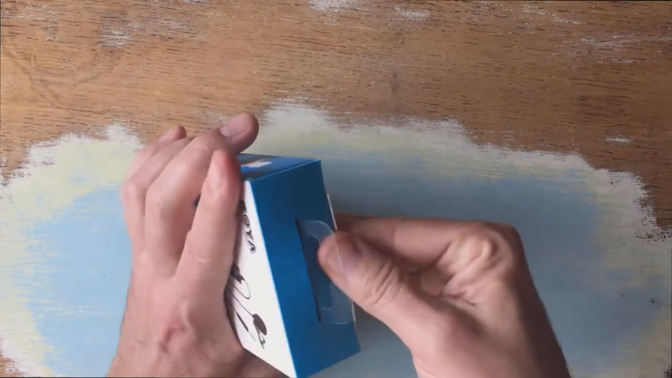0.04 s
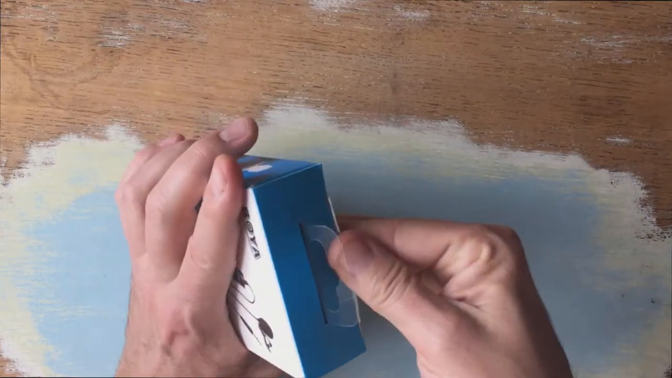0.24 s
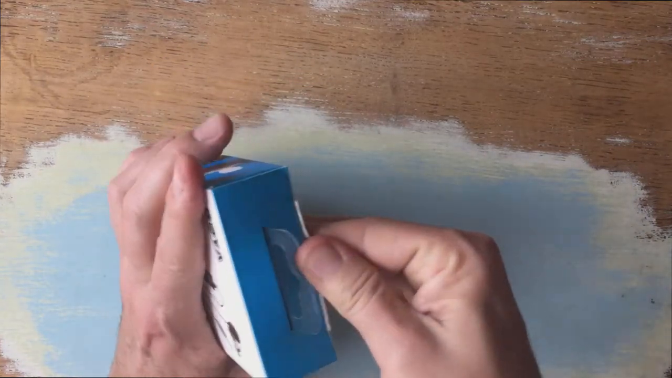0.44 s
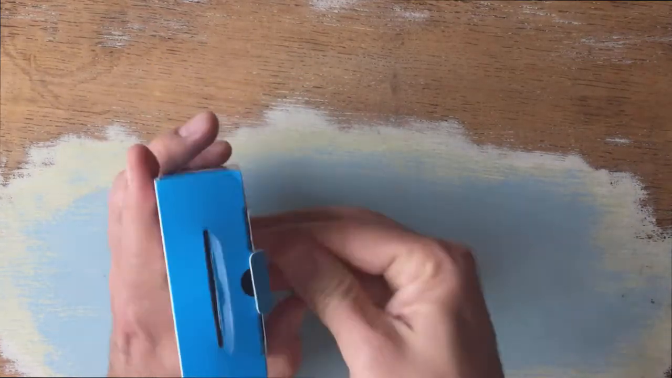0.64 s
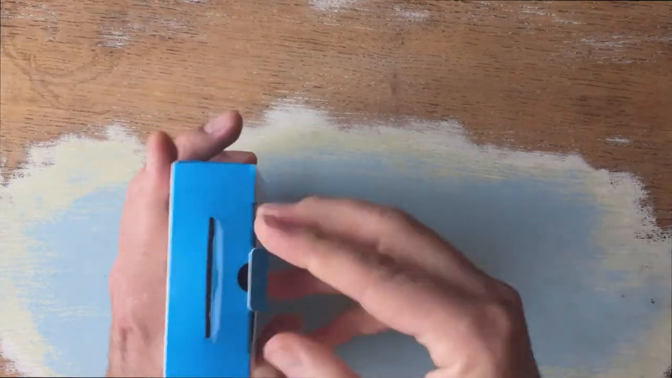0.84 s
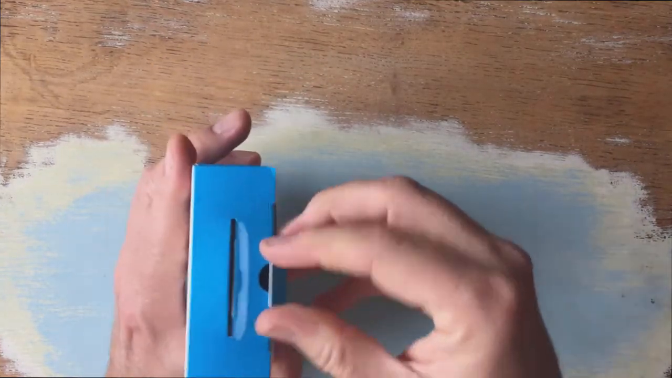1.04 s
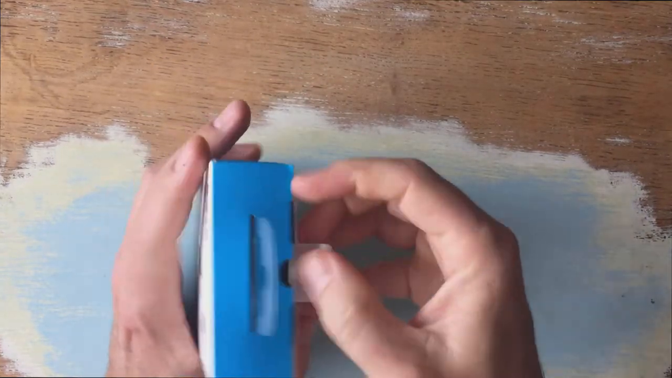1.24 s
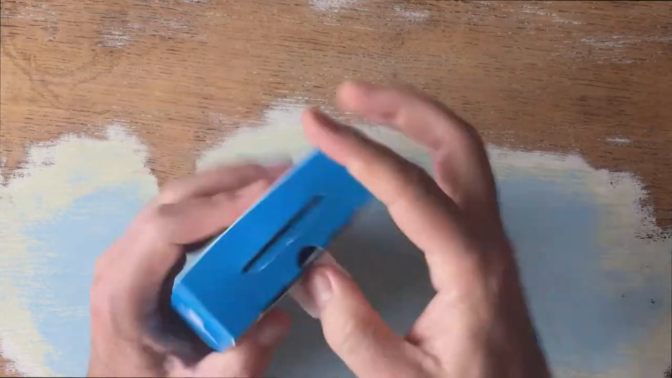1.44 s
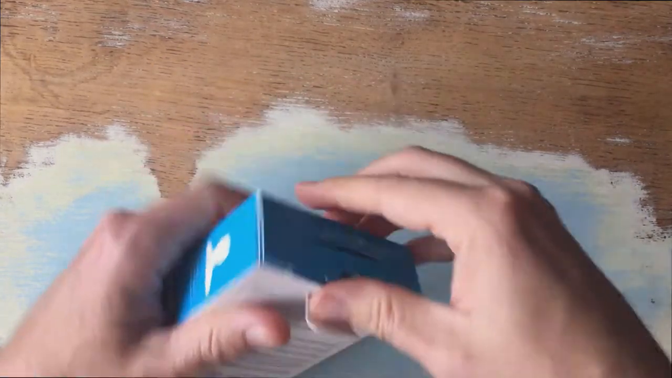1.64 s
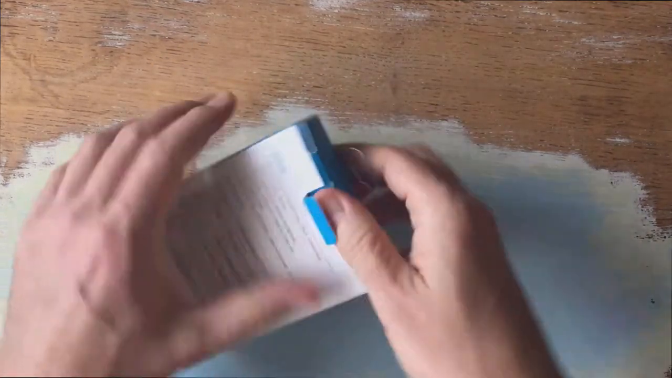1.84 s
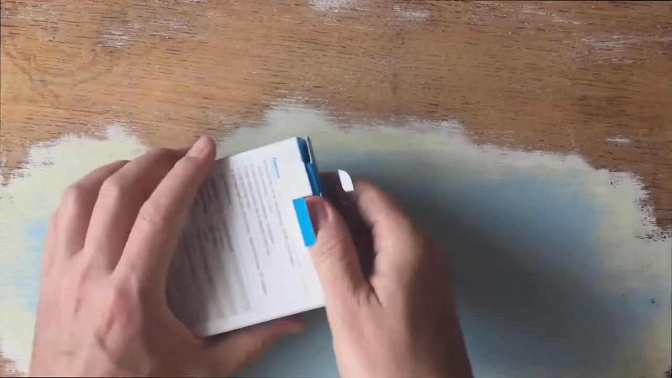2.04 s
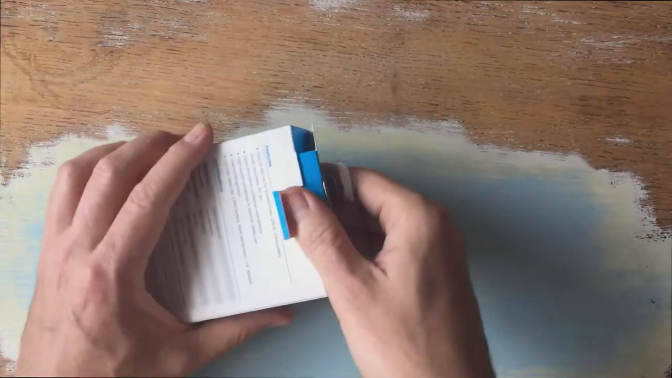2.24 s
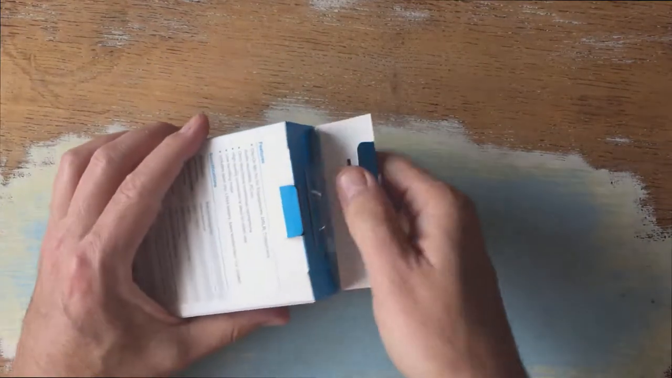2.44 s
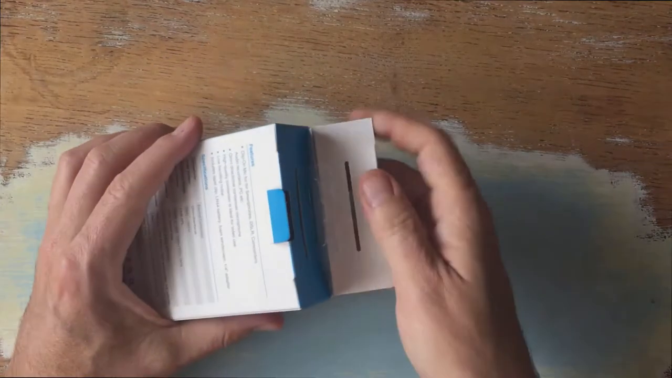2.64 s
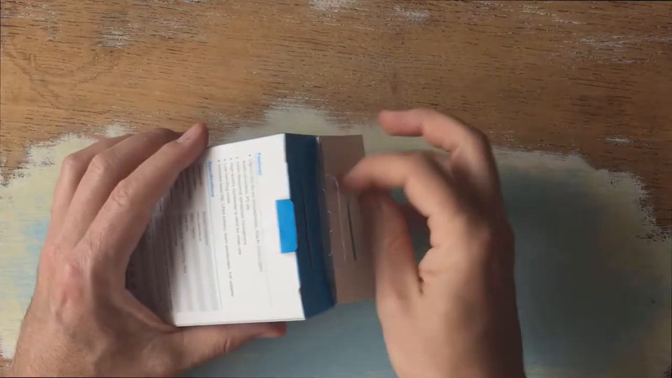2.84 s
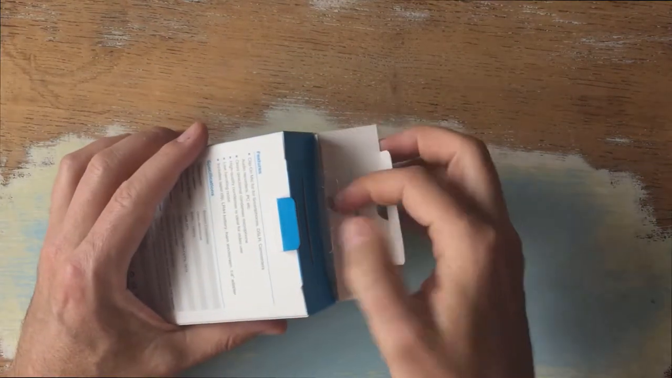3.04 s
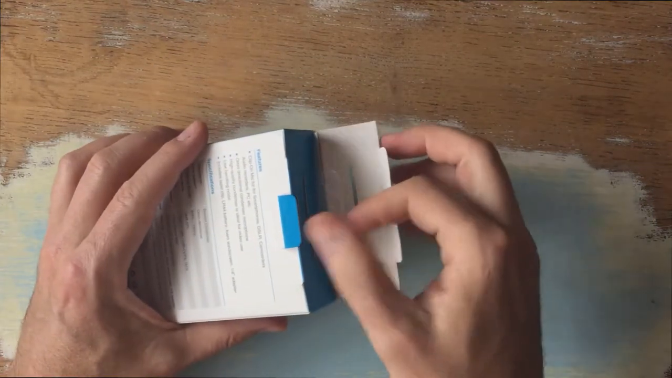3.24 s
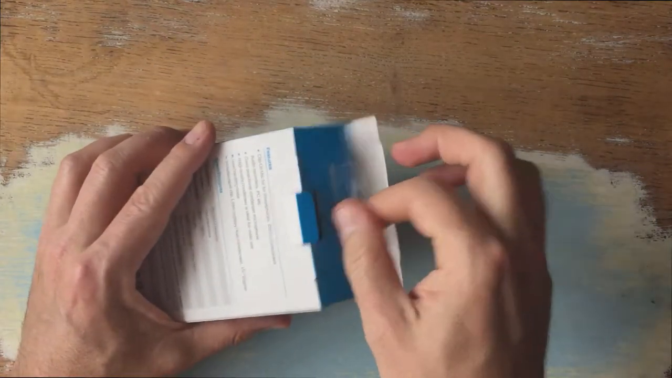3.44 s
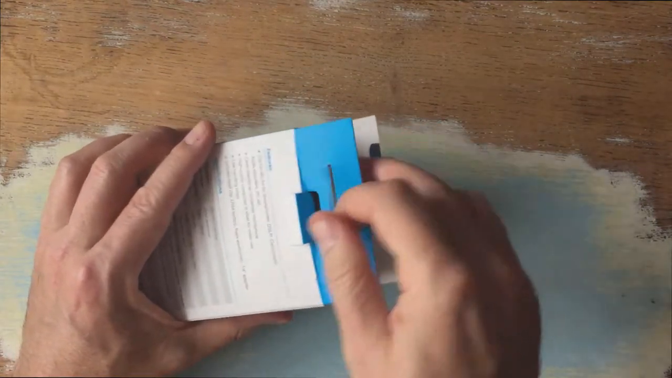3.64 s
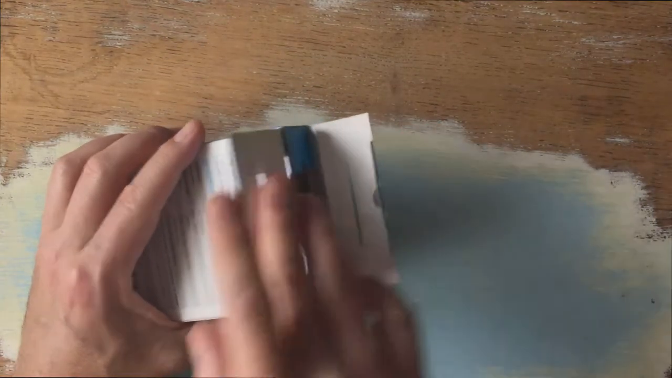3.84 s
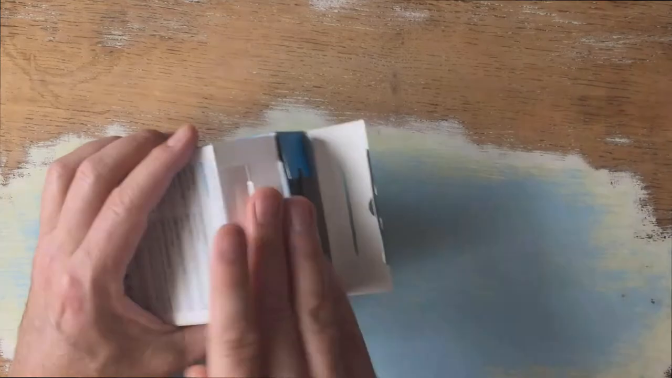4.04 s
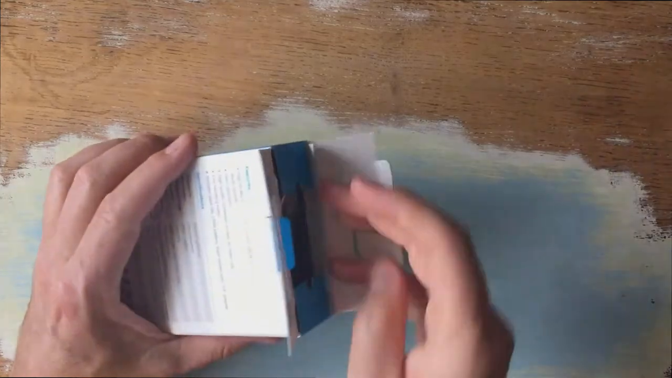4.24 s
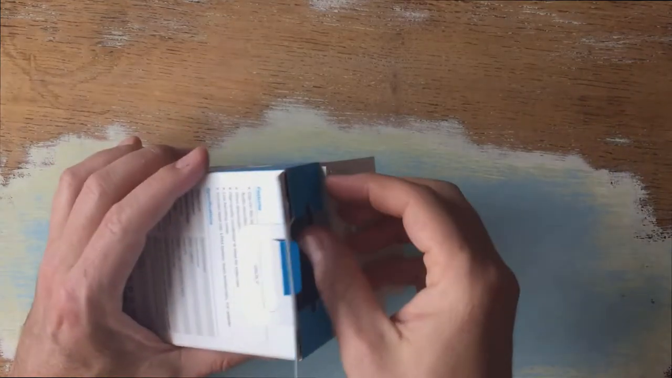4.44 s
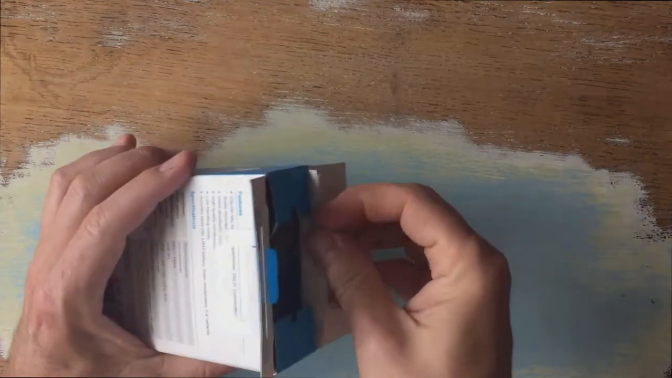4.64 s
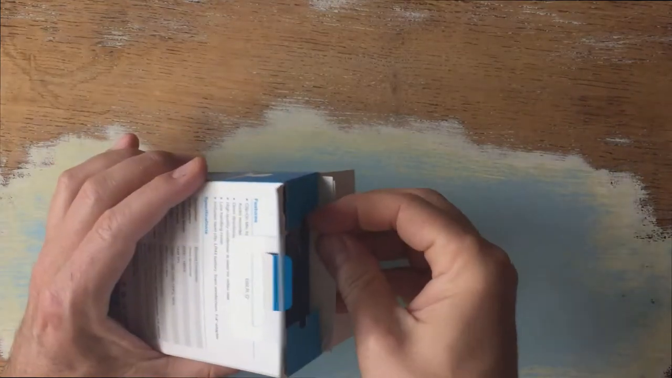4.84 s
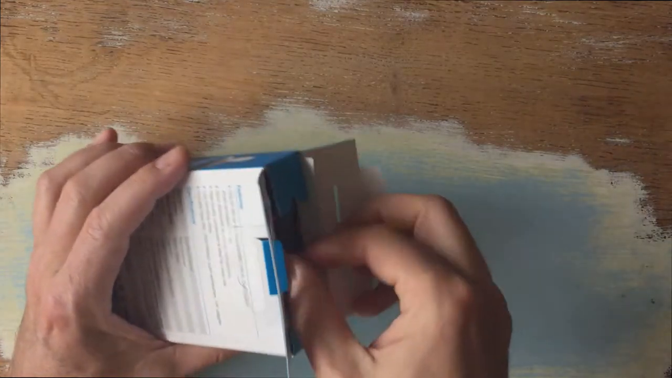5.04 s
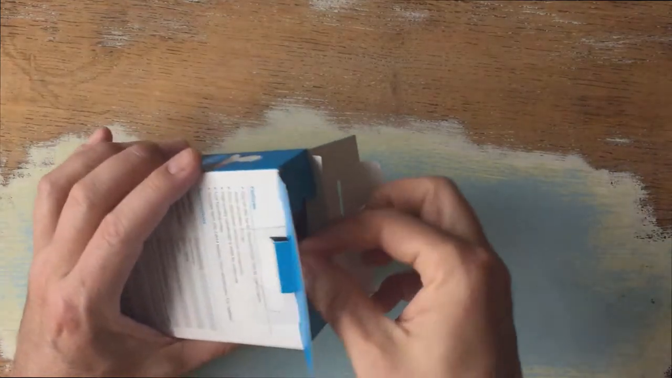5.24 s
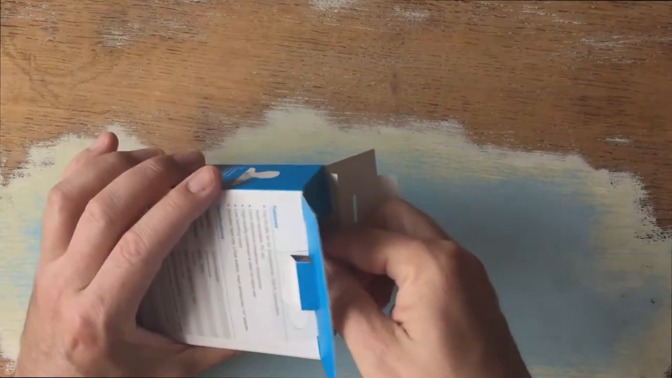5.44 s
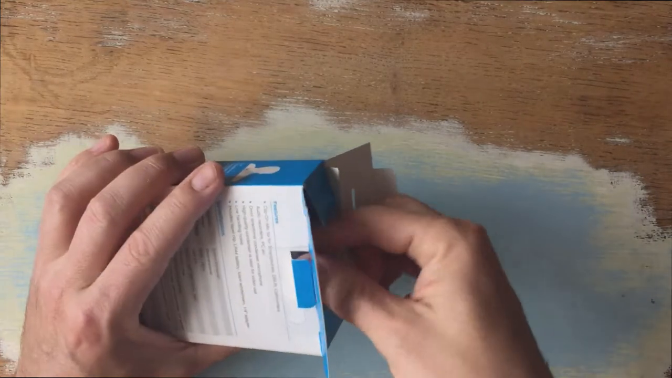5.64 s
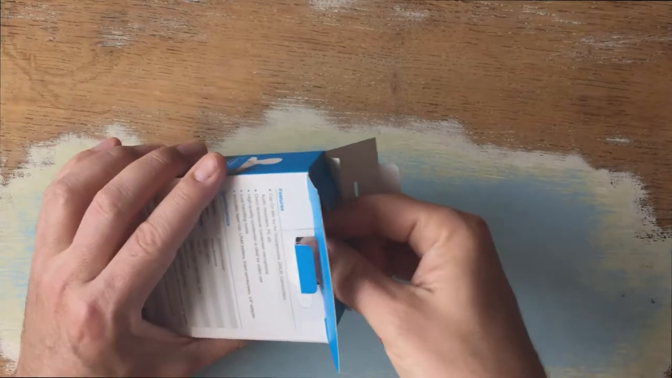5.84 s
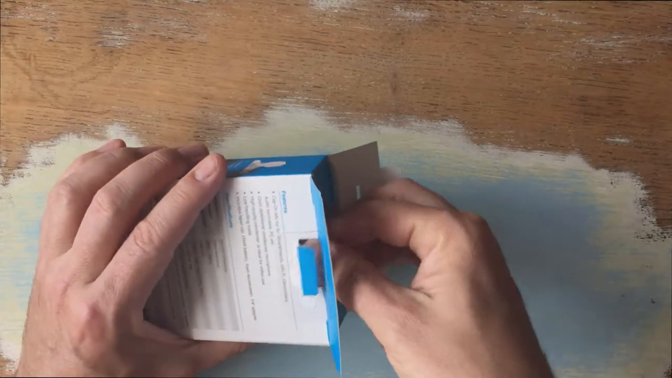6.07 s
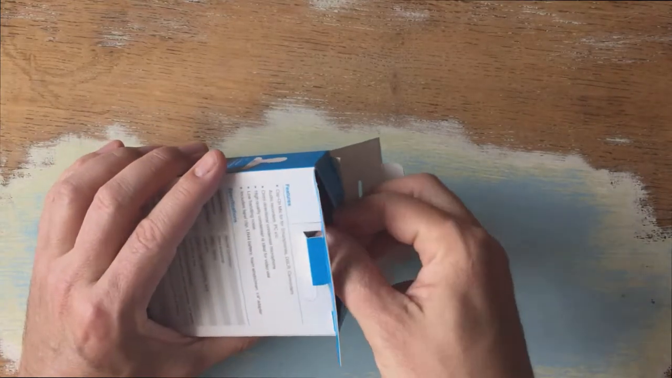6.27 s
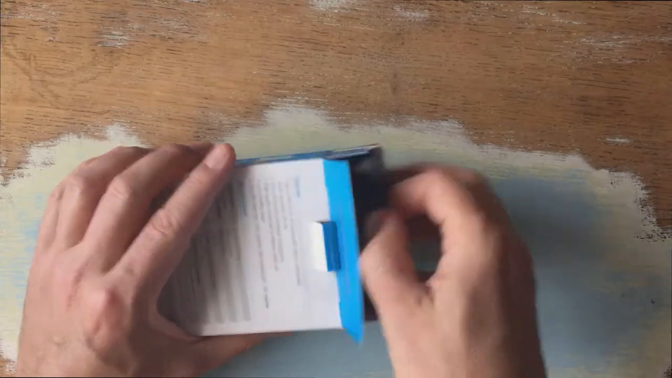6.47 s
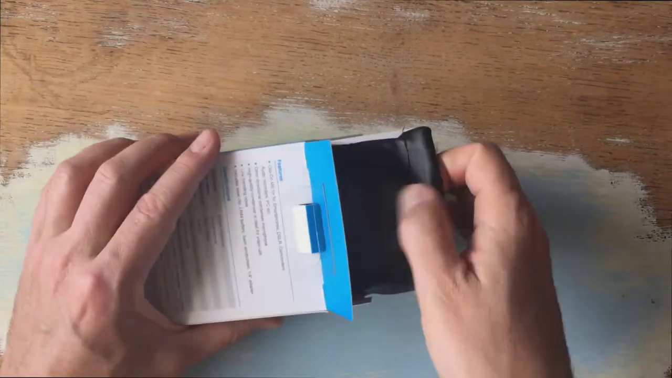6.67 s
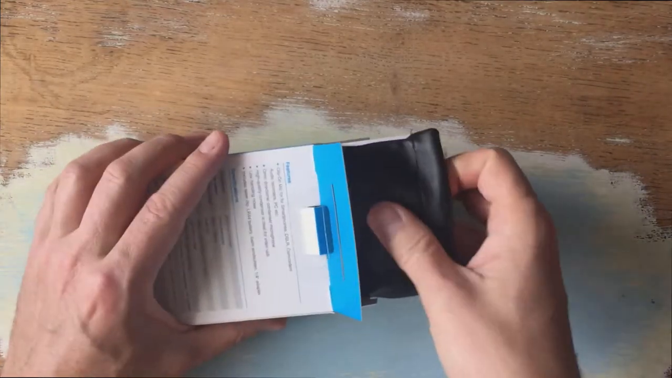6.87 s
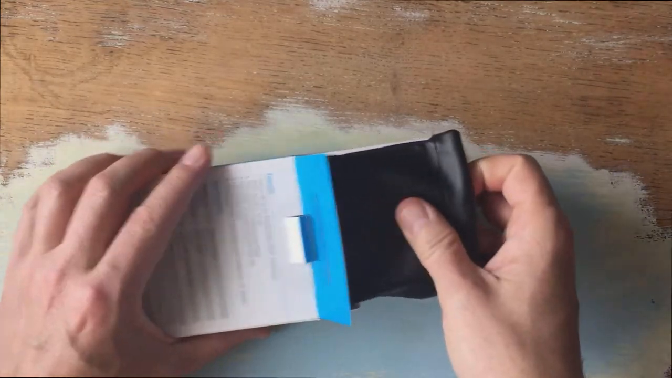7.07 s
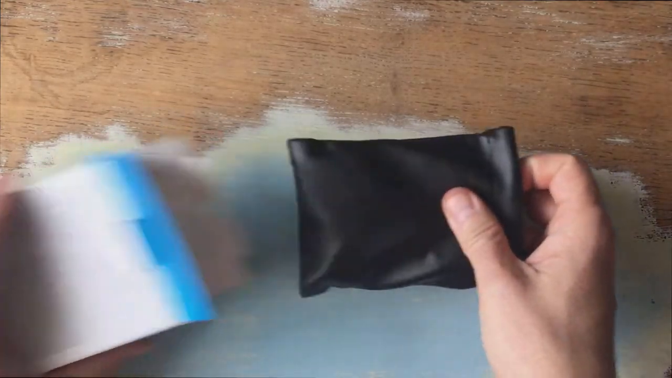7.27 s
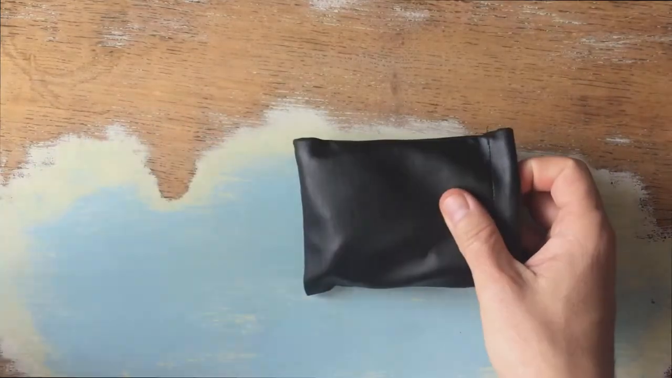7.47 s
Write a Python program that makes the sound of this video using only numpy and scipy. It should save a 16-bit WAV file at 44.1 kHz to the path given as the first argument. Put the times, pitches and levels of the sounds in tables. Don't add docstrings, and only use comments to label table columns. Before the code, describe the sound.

A small cardboard box handled close to a phone microphone on a wooden table in a quiet room. Faint rubbing and a fading low motor drone, a sharp knock with tearing edge, then a heavy woody thump and rocking bumps. Flaps snap and scrape open, fingers tick and mutter inside the hollow, a soft pouch slides out with dry friction, and a few quick hollow knocks finish.

```python
import sys
import numpy as np
from scipy import signal
from scipy.fft import rfft, irfft
from scipy.io import wavfile
from scipy.ndimage import uniform_filter1d

SR = 44100
rng = np.random.default_rng(int(sys.argv[2]) if len(sys.argv) > 2 else 0)


def transcribe(u):
    v = np.clip(np.atleast_2d(u).T, -1, 1)
    q = np.round(v * 32767).astype(np.int16)
    wavfile.write(sys.argv[1], SR, q)


def undo_db(level):
    steps = np.asarray(level, float) / 20
    return 10 ** steps


N = 331191


def rms_one(x):
    return x / np.sqrt(np.mean(x ** 2) + 1e-20)


def filtered(x, order, hz, kind):
    return signal.sosfilt(signal.butter(order, hz, kind, fs=SR, output="sos"), x)


def resonate(x, hz, width_hz):
    r = np.exp(-np.pi * width_hz / SR)
    gain = (1 - r * r) / 2
    return signal.lfilter([gain, 0, -gain], [1, -2 * r * np.cos(2 * np.pi * hz / SR), r * r], x)


def body(x, modes):
    return sum((-1) ** k * undo_db(db) * resonate(x, hz, width) for k, (hz, width, db) in enumerate(modes))


def drift(rate_hz):
    slow = filtered(rng.standard_normal(N + SR), 2, rate_hz, "low")
    return rms_one(slow[SR:])


def add(out, sound, start, db, blur):
    sound = sound * undo_db(db) / np.sqrt(np.max(uniform_filter1d(sound ** 2, blur)))
    first, last = max(start, 0), min(start + len(sound), N)
    out[first:last] += sound[first - start:last - start]


def friction(per_s, spread_db, patchy_db):
    strength = undo_db(spread_db * np.minimum(rng.exponential(1, N), 4))
    catches = (rng.random(N) < per_s / SR) * strength * rng.choice([-1, 1], N)
    return (catches + 0.21 * rng.standard_normal(N)) * undo_db(patchy_db * drift(47))


def slips(events, modes, sharpness, body_db, rough, push, blur):
    out, lead = np.zeros(N), SR // 20
    ms = (np.arange(3 * lead) - lead) * 1000 / SR
    chance = rng.standard_normal((len(events), 2, len(ms)))
    for (s, db, hz, rise_ms, fall_ms), (fine, lumps) in zip(events, chance):
        built_up = ms / max(rise_ms, .1)
        shape = undo_db(8 * np.where(ms < 0, built_up, -ms / max(fall_ms, .1)))
        shape = shape * np.clip((built_up + 2.2) * 4, .15, 1)
        release = push * (ms >= 0) * undo_db(-8 * ms * hz / 1000)
        grain = np.tanh(2 * fine) * undo_db(rough * rms_one(uniform_filter1d(lumps, blur)))
        force = release + shape * grain
        favoured = resonate(resonate(force, hz, hz / sharpness), hz, 6.5 * hz / sharpness)
        add(out, favoured + undo_db(body_db) * body(force, modes), round(s * SR) - lead, db, blur)
    return out


# columns pitch_hz, level_db
ROOM_AIR = [(30, -2.5), (109, 3.5), (374, -6), (632, -13), (1320, -13), (9220, -21), (13700, -25.5),
            (16000, -43)]


def room_tone():
    hz, db = np.transpose(ROOM_AIR)
    grid_hz = np.arange(1, N // 2 + 2) * SR / N
    colour = undo_db(np.interp(np.log(grid_hz), np.log(hz), db))
    return undo_db(-67) * rms_one(irfft(rfft(rng.standard_normal(N)) * colour, N))


# columns start_s, level_db
MOTOR_FADE = [(0, -63.5), (1.3, -71.5), (1.799, -74), (7.51, -87)]


def far_motor():
    s, db = np.transpose(MOTOR_FADE)
    drone = resonate(resonate(rng.standard_normal(N), 200, 31), 140, 50)
    return undo_db(np.interp(np.arange(N) / SR, s, db)) * rms_one(drone)


# columns start_s, table_level_db, box_level_db
HANDLING = [(0, -48, -51), (0.299, -70.5, -65.5), (.9, -98, -75.5), (1.351, -72.5, -61),
            (1.598, -69.5, -65), (2.101, -46, -53.5), (2.599, -75.5, -68), (3.102, -68.5, -98),
            (3.698, -57.5, -55.5), (4.5, -77, -71.5), (5.6, -70, -59.5), (6.001, -67.5, -63),
            (7.1, -73.5, -62), (7.51, -69.5, -76)]
# columns pitch_hz, level_db, t60_s
TABLE_MODES = [(98, -19, .2), (146, -10, .5), (190, -24, .07), (226, -2, .16), (262, 0, .15),
               (325, -4, .05), (410, -20, .15), (440, -11, .22), (610, -21, .14), (830, -13, .11),
               (905, -14, .14)]
# columns pitch_hz, width_hz, level_db
BOX_MODES = [(651, 260, 4.5), (850, 420, 2.5), (1250, 500, 3.5), (1580, 360, 3), (1900, 700, -2)]


def rubbing():
    s, *levels = np.transpose(HANDLING)
    table_db, box_db = [np.interp(np.arange(N) / SR, s, db) for db in levels]
    damped_modes = [(hz, 1.2 / t60 + 25, db) for hz, db, t60 in TABLE_MODES[:8]]
    rumble = rms_one(body(friction(300, 3.0, patchy_db=2.0), damped_modes))
    rustle = rms_one(body(friction(900, 3.0, patchy_db=4.0), BOX_MODES))
    return undo_db(table_db) * rumble + undo_db(box_db - 5) * rustle


# columns pitch_hz, width_hz, level_db
FIBRE_MODES = [(3840, 750, 5), (4360, 1100, 7.5), (5210, 2000, 7), (6750, 2100, 3), (8620, 1100, 3),
               (13490, 5200, -1.5), (16600, 2200, -2.5)]


def rubbed_card():
    slide, split = friction(2600, 2.9, patchy_db=2.0), len(BOX_MODES)
    voices = np.array([undo_db(db) * resonate(resonate(slide, hz, width), hz, 1.1 * width)
                       for hz, width, db in BOX_MODES + FIBRE_MODES])
    voices = voices * [undo_db(2.2 * drift(14)) for _ in voices]
    voices[:split] /= np.std(voices[:split].sum(0))
    voices[split:] /= np.std(voices[split:].sum(0))
    return slide, voices


def strokes(rows, card):
    slide, voices = card
    out, edge_s = np.zeros(N), .018
    grips = rng.normal(0, 1.6, (len(rows), len(voices)))
    for (start, swell_ms, fade_ms, box_db, fibre_db, hz), grip_db in zip(rows, grips):
        marks = start + np.cumsum([-edge_s / 2, edge_s / 2, swell_ms / 1000, fade_ms / 1000, edge_s])
        span = slice(max(round(marks[0] * SR), 0), min(round(marks[-1] * SR), N))
        t = np.arange(span.start, span.stop) / SR
        pressure = undo_db(np.interp(t, marks, [-29, -10.5, 3.5, -10.5, -35.5]))
        levels = undo_db(grip_db + np.repeat([box_db, fibre_db], [len(BOX_MODES), len(FIBRE_MODES)]))
        bright = rms_one(resonate(resonate(slide[span], hz, hz / 13.0), hz, hz / 2.8))
        bright_db = (box_db if hz < 2400 else fibre_db) - 4.0
        out[span] += pressure * (levels @ voices[:, span] + bright * undo_db(bright_db))
    return out


# columns start_s,
# length_ms, box_level_db, fibre_level_db, brightest_pitch_hz
PULL_EVENTS = [(0.0, 125, -61.5, -84, 1560), (0.791, 52, -76.5, -57, 620), (1.238, 46, -54, -58.5, 1410),
               (1.548, 126, -54, -59.5, 3040), (1.902, 150, -64.5, -72.5, 915),
               (3.001, 55, -60, -54.5, 4230), (3.482, 130, -39.5, -40, 3370), (4.13, 100, -53, -50.5, 2580),
               (5.678, 39, -47, -61, 583), (6.131, 118, -56.5, -57.5, 1820), (7.13, 128, -48.5, -48, 11250),
               (7.45, 55, -55.5, -81, 1005), (0.640, 29, -65.5, -60, 5460), (1.665, 56, -61, -59, 13300),
               (1.735, 150, -74.5, -63, 13300), (4.63, 51, -68.5, -73, 3020),
               (4.935, 34, -61.5, -61.5, 1900), (5.17, 45, -65, -66.5, 1900), (4.39, 52, -69, -65.5, 2160),
               (2.875, 46, -81, -60.5, 3740), (2.878, 63, -64, -81.5, 1250), (3.10, 32, -75, -68, 4100),
               (3.225, 29, -60.5, -54, 6500), (1.95, 230, -66.5, -79, 1460), (2.29, 112, -59, -81, 1490),
               (3.64, 31, -50, -61, 2420), (2.52, 63, -55.5, -69.5, 960)]


def pulls(card):
    swell = 0.66
    return strokes([(s, swell * ms, (1 - swell) * ms, *voice) for s, ms, *voice in PULL_EVENTS], card)


# columns start_s, level_db, favoured_pitch_hz, fall_ms
THUMP_EVENTS = [(0.004, -40, 281, 7.1), (0.633, -52.5, 146, 1.7), (0.676, -32, 430, 3.4),
                (0.696, -29, 286, 0.74), (1.3671, -44.5, 426, 1.6), (1.5077, -6.5, 270, 7.8),
                (1.539, -22.5, 261, 3.7), (1.6445, -21, 274, 15.6), (1.856, -24.5, 200, 9.6),
                (2.105, -19, 250, 16.5), (1.608, -30.5, 272, 42), (2.4479, -31.5, 326, 5.5),
                (2.69, -41, 143, 9.2), (3.1896, -37, 170, 5.5), (3.4229, -44, 326, 4.9),
                (3.5874, -38, 127, 2.4), (3.6643, -43.5, 128, 0.77), (3.731, -35.5, 186, 5.3),
                (3.8625, -36.5, 232, 2.1), (4.0388, -44, 230.4, 3.1), (5.3082, -40.5, 150.9, 3.1),
                (6.622, -49.5, 145, 5.5), (7.2524, -43.5, 335, 15), (7.291, -43.5, 148, 17),
                (7.499, -41.5, 245, 12)]


def thumps(events):
    out, t = np.zeros(N), np.arange(SR // 2) / SR
    luck = rng.standard_normal((len(events), len(TABLE_MODES), 2))
    for (s, db, near_hz, fall_ms), chance in zip(events, luck):
        contact_ms = 0.94 * undo_db(-0.48 * db)
        settle_s = .003 + .0012 * contact_ms
        ring = 0
        for (hz, mode_db, t60), (stronger, turn) in zip(TABLE_MODES, chance):
            share_db = mode_db + 1.3 * stronger - 10 * min(abs(np.log2(hz / near_hz)), 2)
            damped_t60 = t60 * (fall_ms / 17) ** 0.55
            ring = ring + undo_db(share_db - 60 * t / damped_t60) * np.sin(2 * np.pi * hz * t + 0.3 * turn)
        ring = ring * np.sin(np.pi / 2 * np.minimum(t / settle_s, 1)) ** 2
        add(out, ring, round((s - settle_s) * SR), db, blur=300)
    return out


# columns start_s, level_db, pitch_hz
TICK_EVENTS = [(0.093, -61, 1560), (0.1693, -56, 1610), (0.923, -64, 2610), (1.0125, -60, 4300),
               (1.1954, -55.5, 2100), (1.621, -60, 2360), (1.709, -53, 4160), (1.776, -53.5, 3470),
               (1.955, -50, 12800), (1.962, -56, 12000), (1.990, -56, 12900), (2.183, -71, 11000),
               (2.406, -40.5, 3400), (2.436, -33, 2600), (2.456, -31, 2300), (2.479, -36, 2500),
               (2.418, -30, 3300), (3.405, -40, 6040), (3.675, -55, 7000), (3.754, -53, 2500),
               (0.227, -61, 1490), (4.2522, -45.5, 2340), (4.634, -59.5, 8000), (4.7616, -59, 1100),
               (4.7796, -48.5, 6140), (4.801, -48, 8170), (4.8695, -54.5, 4620), (4.918, -58, 3800),
               (5.043, -50, 1300), (5.1985, -58.5, 2920), (5.226, -64, 8200), (5.2455, -50.5, 1690),
               (5.401, -55, 1970), (5.426, -56, 1470), (5.563, -43, 1590), (5.681, -47, 1230),
               (5.6896, -41.5, 2550), (5.725, -57, 7200), (5.743, -39, 2100), (5.756, -35.5, 2300),
               (5.765, -34, 1900), (5.872, -41, 1700), (5.942, -65.5, 2400), (6.1314, -48.5, 5170),
               (6.172, -51.5, 2100), (6.235, -53, 5540), (6.312, -55, 2100), (6.403, -51.5, 1460),
               (6.416, -44.5, 2300), (6.475, -49, 2520), (6.4925, -38.5, 1980), (6.519, -42, 2100),
               (6.590, -40, 3800), (6.818, -56, 1770), (6.8378, -52, 3030), (6.897, -61.5, 2140),
               (6.942, -56.5, 1800), (7.0075, -53, 1800), (7.3233, -37, 1710), (7.466, -48, 1450)]


def ticks():
    rise_ms, fall_ms = 0.68, 1.6
    return slips([(*row, rise_ms, fall_ms) for row in TICK_EVENTS], BOX_MODES + FIBRE_MODES,
                 sharpness=6.2, body_db=-16.5, rough=3.5, push=1.9, blur=40)


def panel_slips(rows):
    return slips(rows, BOX_MODES, sharpness=4.8, body_db=-9, rough=1.5, push=2.2, blur=90)


# columns start_s, level_db, panel_pitch_hz, fall_ms
POP_EVENTS = [(0.1769, -40.5, 1380, 0.52), (0.391, -51, 1520, 2.1), (0.8257, -50, 600, 2.3),
              (1.8538, -37.5, 455, 6.3), (2.4253, -26.5, 2140, 1.4), (2.4845, -29.5, 1490, 13),
              (2.4942, -21, 778, 12), (2.6828, -34.5, 696, 16), (4.5403, -50, 512, 2.5),
              (3.3934, -37.5, 1600, 4.5), (3.4165, -29, 1890, 2.6), (3.5683, -19.5, 1740, 3.5),
              (3.7133, -38.5, 1620, 5.5), (3.8037, -39, 1540, 4.6), (3.92, -30.5, 1250, 11),
              (3.9763, -29.5, 1580, 11), (4.1607, -43, 760, 1.6), (4.384, -46, 638, 16),
              (4.8069, -48, 990, 9.5), (4.9483, -53, 1687, 12), (5.1158, -40, 1316, 5.2),
              (5.5141, -34, 1500, 10), (5.7341, -36.5, 1805, 26), (6.547, -30.5, 2000, 22),
              (1.364, -24.5, 1670, 1.5), (0.681, -23.5, 1413, 9.5), (2.103, -20.5, 568, 13)]


def pops():
    rise_ms = 0.4
    return panel_slips([(s, db, hz, rise_ms, fall_ms) for s, db, hz, fall_ms in POP_EVENTS])


# columns start_s, level_db, panel_pitch_hz, fall_ms
KNOCK_EVENTS = [
    (.6745, -21, 680, 3),
    (2.0990, -16, 1150, 1.4),
    (7.3132, -30, 800, 1.2),
    (7.3375, -24, 740, 2.5),
    (7.3470, -25, 700, 2),
    (7.3580, -19, 860, 1.2),
    (7.3675, -22, 800, 1.5),
]


def knocks():
    rise_ms = .3
    return slips([(s, db, hz, rise_ms, fall_ms) for s, db, hz, fall_ms in KNOCK_EVENTS], BOX_MODES,
                 sharpness=5.0, body_db=-21, rough=1.0, push=4.0, blur=90)


def edge_slips(rows):
    return slips(rows, FIBRE_MODES, sharpness=8.0, body_db=-11.5, rough=4.5, push=3.4, blur=40)


# columns start_s, level_db, pitch_hz, rise_ms
TEAR_EVENTS = [(0.6791, -12, 7280, 3.3), (1.2708, -42.5, 4070, 4.5), (1.474, -30, 4520, 10.7),
               (1.504, -36.5, 3700, 1.6), (1.7236, -45, 2860, 15), (2.2604, -24, 4540, 1.3),
               (2.4466, -24.5, 3270, 5.1), (3.2813, -31.5, 4330, 1.95), (3.5597, -26.5, 9200, 7.2),
               (3.8502, -24, 3920, 1.3), (4.383, -40.5, 6560, 6), (4.569, -31.5, 8330, 1.05),
               (4.5855, -35, 4130, 2), (4.818, -43.5, 13200, 19), (5.1163, -39, 2980, 3.5),
               (5.6332, -40, 6460, 18)]


def tears():
    fall_ms = 1
    return edge_slips([(*row, fall_ms) for row in TEAR_EVENTS])


# columns start_s, length_ms, box_level_db, fibre_level_db, brightest_pitch_hz
SCUFF_EVENTS = [(0.686, 102, -50.5, -52, 675), (1.013, 67, -74, -69.5, 4300), (2.101, 41, -36, -78, 610),
                (2.667, 61, -43.5, -50, 795), (3.171, 25.6, -42, -48, 5770), (3.393, 50, -44, -46, 1870),
                (3.702, 71, -64, -61, 1756), (3.973, 120, -45.5, -53, 2370), (4.568, 41, -51.5, -56, 5280),
                (4.799, 28, -51, -57, 4520), (4.87, 31, -59, -60, 5400), (5.245, 85, -56, -59, 1200),
                (5.39, 99, -61.5, -64, 1800), (5.736, 34, -51, -41.5, 2060),
                (5.851, 29, -47.5, -56.5, 1380), (6.278, 53, -50, -58.5, 1710),
                (6.93, 86, -58, -66.5, 1130), (7.243, 100, -47, -48.5, 730), (7.335, 29, -39.5, -66, 850)]


def scuffs(card):
    swell_ms = 14
    return strokes([(s, swell_ms, ms - swell_ms, *voice) for s, ms, *voice in SCUFF_EVENTS], card)


# columns start_s, level_db, panel_pitch_hz, rise_ms
BEND_EVENTS = [(0.6938, -32, 405, 9.3), (1.271, -43, 1850, 2.8), (1.3631, -25.5, 513, 9.3),
               (1.4741, -29, 1430, 8.7), (2.262, -26, 1330, 9.7), (2.4445, -19.5, 1310, 3.6),
               (3.1795, -32.5, 492, 9.1), (3.729, -35, 520, 8.3), (3.8594, -29, 540, 12),
               (4.5815, -42, 1810, 15.5), (5.2614, -46.5, 1155, 6.9), (5.3246, -38.5, 826, 8.6),
               (5.8647, -45.5, 1450, 13), (6.2957, -35.5, 684, 3.1), (6.6328, -29.5, 620, 8.3),
               (6.8422, -42, 900, 3.8), (6.975, -42, 1170, 3.9), (7.2486, -26, 780, 4.2)]


def bends():
    return panel_slips([(*row, 0.57 * row[-1]) for row in BEND_EVENTS])


# columns start_s, level_db, pitch_hz
CRUNCH_EVENTS = [(0.6953, -26.5, 6200), (2.469, -24.5, 3860), (3.9812, -36, 2400), (5.2603, -45, 8470),
                 (5.2986, -43, 3070), (6.5716, -37, 3460), (7.2454, -30, 2530), (7.318, -37.5, 6100),
                 (7.337, -37, 2950)]


def crunches():
    rise_ms, fall_ms = 1.9, 3.7
    return edge_slips([(*row, rise_ms, fall_ms) for row in CRUNCH_EVENTS])


# columns start_s, length_ms, box_level_db, fibre_level_db, brightest_pitch_hz
SLIDE_EVENTS = [(1.108, 65, -66.5, -59.5, 9260), (1.281, 160, -55, -55, 5300),
                (1.439, 137, -48.5, -57.5, 4720), (2.202, 120, -51, -54, 990), (2.392, 110, -37, -44, 3850),
                (3.25, 77, -46, -52, 2700), (3.83, 79, -42.5, -50.5, 3900), (4.228, 74, -58, -63.5, 635),
                (5.029, 114, -61, -56.5, 6550), (5.468, 152, -52, -54.5, 6860),
                (5.952, 183, -67, -68, 1900), (6.385, 74, -53, -65, 1050), (6.479, 120, -42.5, -46.5, 2570),
                (6.56, 142, -46.5, -44.5, 12100), (6.819, 54, -54.5, -55.5, 4475),
                (7.0, 124, -59.5, -60.5, 1960)]


def slides(card):
    swell = 0.48
    return strokes([(s, swell * ms, (1 - swell) * ms, *voice) for s, ms, *voice in SLIDE_EVENTS], card)


# columns start_s, level_db, pitch_hz
SNAP_EVENTS = [(1.3591, -18.5, 15200), (1.363, -22, 5740), (2.4234, -17.5, 4000), (2.4277, -19.5, 8600),
               (2.4918, -20.5, 4650), (2.5019, -22, 4170), (2.6813, -29.5, 4980), (3.185, -36, 8400),
               (3.4171, -26.5, 5190), (3.568, -7.5, 8620), (3.7239, -32, 2730), (3.9202, -28, 2560),
               (4.16, -37, 6540), (4.2713, -47, 6740), (5.267, -45.5, 7700), (5.317, -38, 8600),
               (5.48, -46, 4300), (5.53, -28.5, 2120), (5.5783, -40.5, 3220), (5.6408, -40, 6800),
               (5.8563, -41, 5700), (7.359, -38, 3040), (7.480, -50, 2080)]


def snaps():
    rise_ms, fall_ms = .65, .6
    return edge_slips([(*row, rise_ms, fall_ms) for row in SNAP_EVENTS])


# columns start_s, level_db, favoured_pitch_hz, fall_ms
MORE_THUMP_EVENTS = [(1.5365, -17, 222, 2.8), (2.103, -22.5, 860, 10), (2.116, -22.5, 242, 5.8),
                     (2.141, -27, 260, 3), (2.169, -38, 260, 4.2), (2.55, -46.5, 200, 11),
                     (5.645, -52.5, 147, 20), (6.30, -55, 197.6, 10), (4.57, -56.5, 146, 9.4),
                     (1.95, -43.5, 262, 17), (2.01, -43, 238, 14), (2.05, -42.5, 226, 14),
                     (2.30, -47, 240, 8.8), (3.03, -51.5, 199.5, 16)]


def more_thumps():
    return thumps(MORE_THUMP_EVENTS)


# columns start_s, level_db, panel_pitch_hz, fall_ms
MUTTER_EVENTS = [(2.371, -44, 516, 6.7), (2.285, -44.5, 620, 5), (4.232, -48, 673, 8),
                 (4.262, -47.5, 680, 6.2), (4.285, -48.5, 640, 6), (4.994, -53.5, 1250, 4),
                 (5.054, -49.5, 1300, 7.7), (5.365, -57.5, 1300, 3), (5.478, -43, 610, 9.8),
                 (5.62, -46.5, 684, 22), (5.721, -45.5, 620, 5), (5.970, -53, 700, 5),
                 (6.245, -50, 520, 7.8), (6.428, -47, 706, 7.4), (6.482, -47, 720, 6), (7.013, -48, 700, 6),
                 (7.125, -54, 656, 60), (7.361, -34, 2790, 8.7), (7.380, -36, 863, 20.3),
                 (4.212, -53, 680, 6.4)]


def mutters():
    return slips([(s, db, hz, fall_ms / 2, fall_ms) for s, db, hz, fall_ms in MUTTER_EVENTS], BOX_MODES,
                 sharpness=8.3, body_db=-21.5, rough=1.7, push=1.0, blur=90)


# columns start_s, peak_level_db
PUFF_EVENTS = [
    (2.70, -52.5),
    (3.295, -48),
    (3.855, -42),
]


def puffs():
    puff_hz, puff_ms = 71.3, 16
    out = np.zeros(N)
    for s, db in PUFF_EVENTS:
        t = np.arange(N) / SR - s
        hump = np.exp(-(t * 1000 / puff_ms - 1) ** 2)
        out += undo_db(db) * hump * np.sin(2 * np.pi * puff_hz * t)
    return out


# columns start_s, level_db, pitch_hz, rise_ms
TOUCH_EVENTS = [(2.8, -46, 1040, 5.2), (2.7993, -48.5, 3720, 8.1), (2.92, -47, 1250, 8.1),
                (2.92, -49.5, 3540, 6.6), (3.038, -48.5, 1250, 14), (3.0995, -49, 1000, 1.1)]


def touches():
    return slips([(*row, row[-1] / 2) for row in TOUCH_EVENTS], BOX_MODES,
                 sharpness=9, body_db=-30, rough=1.5, push=1, blur=90)


def room(x):
    t, t60_s = np.arange(SR // 2) / SR, 0.24
    low = filtered(rng.standard_normal(len(t)), 1, 2500, "low") * undo_db(-60 * t / t60_s)
    full = 1.8 * rng.standard_normal(len(t)) * undo_db(-60 * t / (.5 * t60_s))
    tail = (low + full) * np.clip(t / 0.0037, 0, 1)
    return undo_db(-12.5) * signal.fftconvolve(x, tail / np.sqrt(np.sum(tail ** 2)))[:N]


def scene():
    card = rubbed_card()
    table = thumps(THUMP_EVENTS) + more_thumps()
    panels = filtered(pops() + knocks() + bends(), 2, 380, "high")
    edges = tears() + crunches() + snaps()
    rubs = rubbing() + pulls(card) + scuffs(card) + slides(card)
    close = rubs + table + ticks() + panels + edges + mutters() + touches()
    close = filtered(close, 3, 85, "high")
    to_walls = close - (1 - undo_db(-12)) * table
    return (close + room(to_walls) + room_tone() + far_motor() + puffs())[None]


# columns start_s, length_ms, muted_share, lowest_pitch_hz
MUTED_MOMENTS = [(0.785, 100, .55, 1400), (0.915, 24, .9, 4400), (1.54, 60, .4, 7500),
                 (1.655, 50, .3, 2300), (1.755, 45, .6, 5500), (1.80, 46, .9, 700), (1.865, 72, .65, 2800),
                 (2.63, 30, .4, 2500), (2.86, 40, .2, 2500), (4.195, 30, .12, 60), (4.283, 40, .4, 4300),
                 (4.84, 70, .5, 7800), (4.885, 30, .2, 2800), (5.44, 30, .15, 1200), (6.57, 30, .1, 40),
                 (6.78, 40, .2, 1200), (7.03, 90, .15, 5500), (7.165, 30, .1, 40), (7.435, 28, .5, 4500)]


def mute_bands(x):
    quiet_db, high_hz, high_share, band_hz, muted_db = -89, 9800, .36, 700, -26
    hz, s, spec = signal.stft(x, SR, nperseg=1024)
    low_band = 3 + 3 * np.log(np.maximum(hz, 300) / 2100)
    band = np.floor(np.where(hz < 2100, low_band, hz / band_hz) + 3).astype(int)
    luck = rng.random((band.max() + 1, len(s) // 4 + 2))
    frame = np.arange(len(s))
    luck = np.array([row[(frame + k % 4) // 4] for k, row in enumerate(luck)])[band]
    faint = uniform_filter1d(np.abs(spec) ** 2, size=15, axis=0) < undo_db(2 * quiet_db)
    height = hz[:, None] / high_hz
    share = faint * (height > 1) * high_share * height ** 1.3
    for start, ms, muted, low_hz in MUTED_MOMENTS:
        lows_first = (hz < 420) * (low_hz < 100)
        now = (s >= start) & (s <= start + ms / 1000)
        share[:, now] = np.maximum(share[:, now], ((hz > low_hz) * muted + lows_first)[:, None])
    gated = spec * np.where(luck < share, undo_db(muted_db), 1)
    return signal.istft(gated, SR, nperseg=1024)[1][:N]


def roll_off(x):
    return signal.sosfilt(signal.butter(12, 16800, fs=SR, output="sos"), x)


def record(dry):
    held = .8 * np.tanh((dry / .8) ** 3 / 3 + dry / .8)
    cut = signal.sosfilt(signal.cheby2(10, 60, 16900, fs=SR, output="sos"), held)
    cut = filtered(cut, 2, 34, "high")
    mix = mute_bands(cut[0])[None]
    return roll_off(mix)


dry = scene()
out = record(dry)
transcribe(out)
```